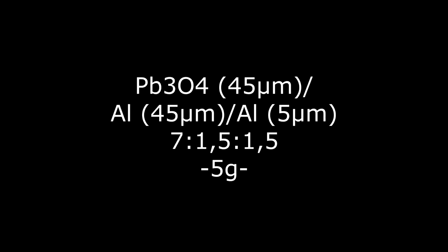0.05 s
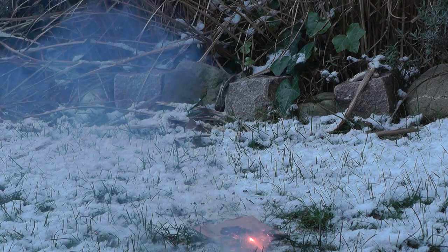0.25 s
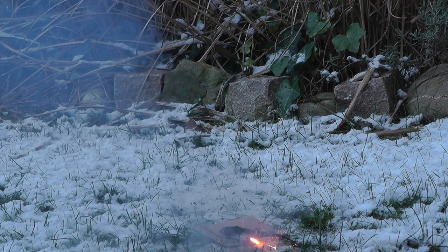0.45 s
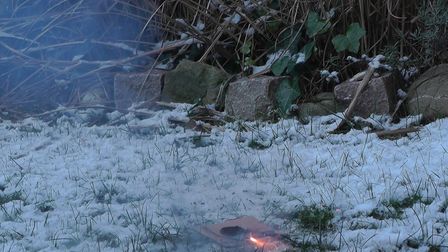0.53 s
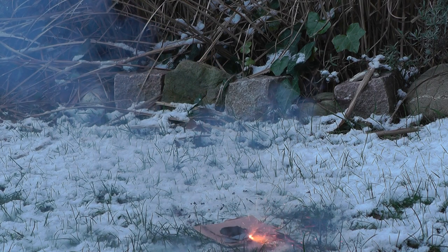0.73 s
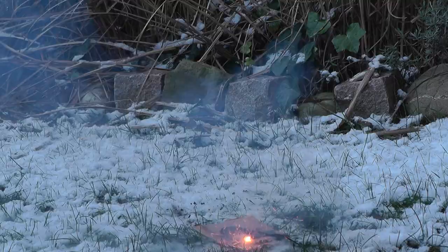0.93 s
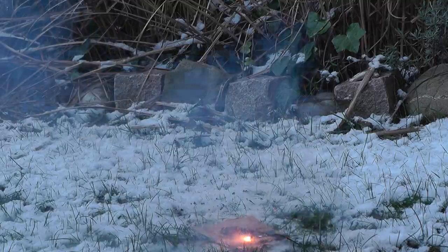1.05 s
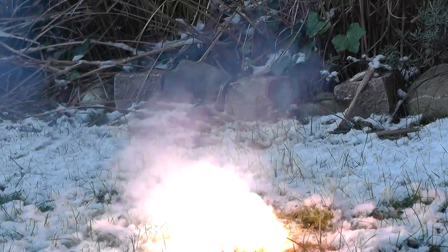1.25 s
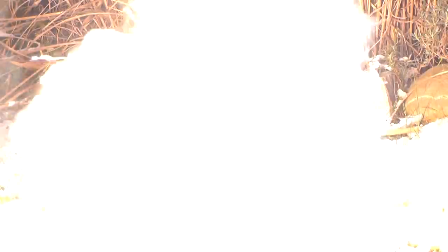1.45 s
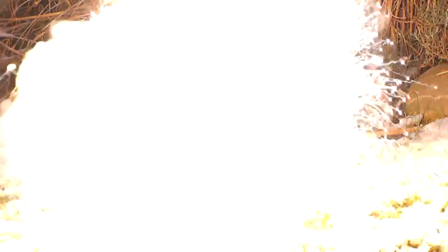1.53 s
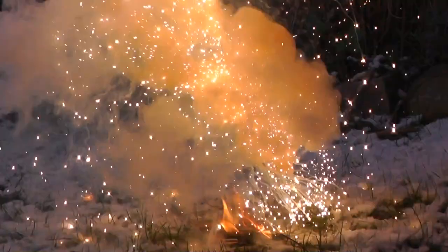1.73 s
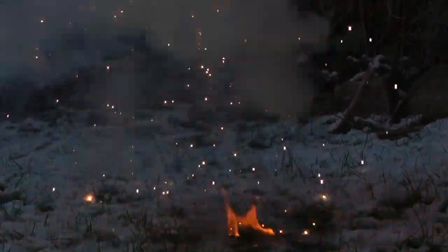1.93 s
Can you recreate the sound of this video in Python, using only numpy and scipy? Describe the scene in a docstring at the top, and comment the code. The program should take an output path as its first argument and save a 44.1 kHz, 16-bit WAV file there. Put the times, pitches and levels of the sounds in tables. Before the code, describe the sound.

A fuse hisses and sputters, then powder ignites with a whoosh and sizzling sparks.

```python
"""A sputtering, fizzing fuse cuts in just after the start, on a snowy lawn over a low outdoor rumble.
Its gas jet hisses, pockets of gas pop, and it burns into a heap of flash powder. The heap burns off
with a low whoosh of flame and a bright sizzle of sparks that thins out to single ticks.
Each burning source is shot noise, a rain of tiny random bursts, on a smooth rush of gas.
Nearby walls answer with echoes and resonances."""
import sys
import numpy as np
from scipy.fft import rfft, irfft, next_fast_len
from scipy.io import wavfile
from scipy.ndimage import map_coordinates

SR = 44100
rng = np.random.default_rng(int(sys.argv[2]) if len(sys.argv) > 2 else 0)


def store_pcm(level_fs):
    """Save levels as 16-bit WAV."""
    pcm = np.round(np.clip(level_fs, -1, 1) * 32767).astype(np.int16)
    wavfile.write(sys.argv[1], SR, np.atleast_2d(pcm).T)


N = 88200

# spectrum of burning metal grains: f/Hz, level/dB
SPARK_SPECTRUM = [(80, -2.5), (400, -2.5), (1100, -1.5), (1800, -1), (3000, 0.5), (4300, 2.5), (5500, -1),
                  (8000, -0.5), (12000, -4.5), (15500, -14.5)]


def amp(db):
    """Amplitude ratio of a level in decibels."""
    return 10 ** (np.asarray(db) / 20)


def unit(x):
    """Normalisation to rms 1."""
    return x / np.sqrt(np.mean(x ** 2) + 1e-20)


def clock():
    """Time of each sample in seconds."""
    return np.arange(N) / SR


def along(points, hz):
    """Interpolation of (f/Hz, value) rows on a logarithmic frequency axis."""
    f, v = np.transpose(points)
    return np.interp(np.log(hz + 1), np.log(f + 1), v)


def curve(rows):
    """Linear interpolation of (t/s, value) rows."""
    return np.interp(clock(), *np.transpose(rows))


def bell(centre_s, half_s):
    """Gaussian envelope, down to 1/e at half_s from its centre."""
    return np.exp(-((clock() - centre_s) / half_s) ** 2)


def wobble(rate):
    """Random modulation: a spline through rate knots a second."""
    return map_coordinates(rng.standard_normal(1024), [clock() * rate], mode="wrap")


def filtered(x, response):
    """Linear filtering: the spectrum of x times a frequency response."""
    m = next_fast_len(N + SR // 2)
    return irfft(rfft(x, m) * response(np.fft.rfftfreq(m, 1 / SR)), m)[..., :N]


def below(x, cutoff_hz):
    """Zero-phase low-pass; subtracting it from x leaves the upper band."""
    return filtered(x, lambda hz: 1 / (1 + (hz / cutoff_hz) ** 4))


def spread(pair, spectrum):
    """Partial coherence: two independent signals mix to coloured stereo of rms 1, widest in the treble."""
    # likeness of left and right: f/Hz, coherence
    coherence = [(30, 0.52), (80, 0.85), (250, 0.72), (550, 0.87), (1100, 0.77), (2100, 0.92), (3500, 0.58),
                 (5000, 0.39), (6000, 0.025), (7800, 0.66), (9700, .15), (10800, 0.32), (12800, 0.14),
                 (14200, 0.26), (15500, .03)]
    angle = lambda hz: np.arccos(np.clip(along(coherence, hz), -1, 1)) / 2
    mid, side = filtered(pair, lambda hz: amp(along(spectrum, hz)) * [np.cos(angle(hz)), np.sin(angle(hz))])
    return unit(np.array([mid + side, mid - side]))


def burning(spectrum, rate, scatter_db, rush_db):
    """Shot noise: tiny bursts of log-normal size, rate a second, on a Gaussian rush of gas."""
    hit = rng.random((2, N)) < rate / SR
    size = amp(scatter_db * np.clip(rng.standard_normal((2, N)), -2, 2))
    polarity = np.sign(rng.standard_normal((2, N)))
    bursts = unit(hit * size * polarity / np.sqrt(rate))
    return spread(bursts + amp(rush_db) * rng.standard_normal((2, N)), spectrum)


def fuse():
    """Jet noise: gas sputters from the fuse, with the fine fizz of the burning core above it."""
    # envelopes of gas jet and core: t/s, level/dB
    jet_level = [(.2, -35), (.35, -33.5), (.39, -33), (.45, -29), (.58, -30), (.72, -32.5), (.88, -32.7),
                 (.93, -32.5), (1.03, -30.6), (1.08, -32.5), (1.2, -32), (1.3, -33.5), (1.7, -60)]
    fizz_level = [(.2, -47), (.29, -48), (.4, -43), (.455, -37), (.6, -34.5), (.7, -38.5), (.79, -38.5),
                  (.825, -43.5), (.97, -56), (1.12, -63), (1.25, -54), (1.6, -111)]
    # their spectra: f/Hz, level/dB
    jet_spectrum = [(40, -30), (150, -13), (300, -4), (700, -1.5), (1200, -3), (2200, -3.5), (3000, -6.5),
                    (4300, -12), (5050, -19.5), (6200, -16.5), (8000, -29.5), (10000, -18), (15000, -30.5)]
    fizz_spectrum = [(1000, -15), (4000, -1.5), (5400, -0.5), (6600, 0.5), (7500, 2.5), (8400, 3),
                     (9200, -1), (11500, -6.5), (15500, -19)]
    jet = burning(jet_spectrum, rate=3400, scatter_db=3, rush_db=1.5)
    jet *= amp(curve(jet_level) + 0.75 * wobble(45.9))
    body = below(jet, cutoff_hz=1200)
    dull_db_per_s, dull_from_s = 11.5, 1.0  # the jet loses its top as it sinks into the heap
    top = (jet - body) * amp(-dull_db_per_s * np.maximum(clock() - dull_from_s, 0))
    fizz = burning(fizz_spectrum, rate=4500, scatter_db=4, rush_db=0.5)
    return body + top + fizz * amp(curve(fizz_level) + 0.72 * wobble(37))


def rumble():
    """Ambient noise: a low outdoor background under slow amplitude modulation."""
    # envelope: t/s, level/dB
    level = [(.2, -48.5), (.7, -48), (.95, -43.5), (1.15, -49), (1.75, -46), (1.85, -45), (2.0, -44)]
    # background spectrum: f/Hz, level/dB
    spectrum = [(20, -19), (50, -16), (78, 1.5), (120, -7.5), (168, 1.5), (300, -15), (1000, -16.5),
                (4000, -32), (15000, -52)]
    return amp(curve(level) + wobble(7.47)) * spread(rng.standard_normal((2, N)), spectrum)


def pops():
    """Pressure transients: each bursting pocket of gas radiates one short swing."""
    # gas pockets: t/s, level/dB before the band-pass, width/s
    pockets = [(.286, -21, 0.00024), (0.3952, -10.5, 0.00017), (.4235, -30, .00015), (.434, -14.5, 0.00018),
               (1.2271, -17, 0.00066), (1.2863, -11.5, 0.00038)]
    pressure = np.zeros(N)
    for s, db, width in pockets:
        age = np.maximum(clock() - s, 0) / width
        pressure += amp(db) * (clock() >= s) * (age / 2 - 1) * np.exp(-age / 2)
    return filtered(pressure, lambda hz: 1j * hz / (120 + 1j * hz) / (1 + 1j * hz / 3500))


def hiss():
    """Diffuse noise: the last length of fuse hisses wide, with little left-right coherence."""
    # envelope: t/s, level/dB
    level = [(.6, -69), (.82, -48), (1.0, -44), (1.1, -43), (1.26, -38.5), (1.4, -58), (1.7, -85)]
    # hiss spectrum: f/Hz, level/dB
    spectrum = [(2000, -32), (4000, -9), (5300, 8), (8000, 5), (9300, 6.5), (10500, -22), (13000, -13),
                (15500, -20)]
    left, right = burning(spectrum, rate=2700, scatter_db=-2, rush_db=2)
    mid, side = left + right, amp(2) * (left - right)
    return unit(np.array([mid + side, mid - side])) * amp(curve(level) + 0.7 * wobble(32.7))


def sputter():
    """Resonance: coarse spits excite a hollow ring that sinks in pitch just before ignition."""
    # envelope as the fuse burns into the heap: t/s, level/dB
    level = [(.7, -73), (.95, -40), (1.05, -33.5), (1.1, -41), (1.14, -39), (1.22, -46), (1.26, -53),
             (1.29, -36), (1.33, -49), (1.6, -94)]
    # single spits: t/s, added level/dB
    spits = [(1.048, 3.5), (1.139, 12.5), (1.173, 11), (1.231, 12)]
    ring = lambda hz: [(hz / 4, -16), (hz / 1.33, -7), (hz, 0),
                       (hz * 1.46, -9), (hz * 4, -26), (hz * 10, -55)]
    high, low = (burning(ring(hz), rate=1000, scatter_db=1.5, rush_db=7) for hz in (1020, 650))
    sunk = curve([(1.044, 0), (1.17, 1)])
    hollow = high * np.sqrt(1 - sunk) + low * np.sqrt(sunk)  # equal-power crossfade
    spit_db = sum(db * bell(s, half_s=0.0081) for s, db in spits)
    return hollow * amp(curve(level) + spit_db + wobble(90.3))


def flame():
    """Combustion noise: the heap smoulders, catches, swells to a fireball and collapses."""
    # envelope: t/s, level/dB
    level = [(.6, -60), (1.15, -44.5), (1.225, -40.5), (1.27, -37.5), (1.31, -32), (1.35, -30.5),
             (1.405, -32), (1.47, -26.5), (1.52, -23), (1.565, -26), (1.615, -33.5), (1.645, -41),
             (1.72, -62)]
    # flame spectrum: f/Hz, level/dB
    spectrum = [(25, -36), (50, -26), (68, -5.5), (120, -8.5), (240, -2.5), (700, -4), (1300, -12.5),
                (2500, -19), (6000, -47), (15000, -39)]
    roar = burning(spectrum, rate=2800, scatter_db=2, rush_db=2) * amp(curve(level) + 0.21 * wobble(40.2))
    billow = below(roar, cutoff_hz=168)
    top = roar - below(roar, cutoff_hz=950)
    blaze = amp(6 * bell(1.46, half_s=0.046))  # the treble lifts while the fireball grows fastest
    spent = amp(-68 * np.maximum(clock() - 1.65, 0))  # the deep billow fades once it has spread
    return billow * spent + top * blaze + (roar - billow - top)


def sparks():
    """Shot noise of falling rate: a spray of burning metal flares, sags and dies into ever fewer grains."""
    full_s, fade_s, full_db = 1.3527, 1.59, -25
    rise_db_per_s, sag_db_per_s, fall_db_per_s, dying_db_per_s2 = 229, 15.5, 36.5, 78
    t = clock()
    late = np.maximum(t - fade_s, 0)
    db = full_db - sag_db_per_s * np.clip(t - full_s, 0, fade_s - full_s)
    db -= fall_db_per_s * late + dying_db_per_s2 * late ** 2
    spray = burning(SPARK_SPECTRUM, rate=6000 * np.exp(-6.9 * late), scatter_db=2, rush_db=5.5)
    spray *= amp(db + 0.24 * wobble(30.55))
    coarse = below(spray, cutoff_hz=7660)
    flare = lambda peak_s: amp(-rise_db_per_s * np.maximum(peak_s - t, 0))
    return coarse * flare(full_s) + (spray - coarse) * flare(full_s - 0.023)  # the finest catch first


def heaves():
    """Volume source: the expanding gas shoves the air in short, deep wave packets."""
    # shoves: t/s, level/dB, f/Hz
    shoves = [(1.346, -29.5, 127), (1.447, -29, 83)]
    return sum(amp(db) * bell(s, half_s=0.0095) * np.sin(2 * np.pi * hz * (clock() - s))
               for s, db, hz in shoves)


def spurts():
    """Band noise in bursts: the spray surges briefly with a narrower, lower hiss."""
    # surges: t/s, half length/s, level/dB
    surges = [(1.353, 0.014, -31), (1.716, 0.02, -36.5)]
    # surge spectrum: f/Hz, level/dB
    spectrum = [(1000, -38), (2800, 2), (4600, 11), (5700, -15), (8000, -12), (15000, -24)]
    envelope = sum(amp(db) * bell(s, half_s) for s, half_s, db in surges)
    return envelope * spread(rng.standard_normal((2, N)), spectrum)


def ticks():
    """Impulsive noise with exponential decay: single sparks snap as they burn out."""
    # last sparks: t/s, level/dB
    snaps = [(1.72, -25), (1.7683, -27), (1.852, -27), (1.88, -36), (1.8848, -29.5), (1.930, -34.5),
             (1.958, -46)]
    t, decay_s = clock(), 0.0005
    envelope = sum(amp(db) * (t >= s) * np.exp(-np.abs(t - s) / decay_s) for s, db in snaps)
    return envelope * spread(rng.standard_normal((2, N)), SPARK_SPECTRUM)


def garden(x):
    """Interference and resonance: nearby walls add echoes and lift or hollow out narrow bands."""
    # reflections: delay t/s, share of the pressure (negative is inverted)
    walls = [(.00218, -0.13), (.00327, -0.051), (0.0126, .24)]
    # resonances of the stone-edged corner: f/Hz, width/Hz, added level/dB
    resonances = [(158.2, 21, 5.5), (241, 28, 4), (278, 18, -2), (388, 57, 1.5), (590.5, 45, 3),
                  (720, 33, 1), (1130, 230, 1.5)]
    echoes = lambda hz: 1 + sum(share * np.exp(-2j * np.pi * hz * s) for s, share in walls)
    lift_db = lambda hz: sum(db / (1 + (2 * (hz - f) / width) ** 2) for f, width, db in resonances)
    return filtered(x, lambda hz: echoes(hz) * amp(lift_db(hz)))


def scene():
    """Superposition: the fire and its reflections add to the background."""
    fire = fuse() + hiss() + sputter() + pops() + flame() + heaves() + sparks() + spurts() + ticks()
    return garden(fire) + rumble()


def record(dry):
    """Transfer function of the microphone, then a quick fade-in and a band limit."""
    # microphone response: f/Hz, level/dB
    response = [(4400, 0), (5700, -1), (7000, 2), (8200, 0), (9800, -5.5), (11500, 1), (15000, 4.5)]
    # channel balance: f/Hz, left minus right level/dB
    balance = [(100, -1.6), (3000, -1.55), (5400, 0.51), (8500, 0), (10000, -0.47), (11200, -2.2),
               (13000, -1), (15200, -2)]
    start_s, fade_in_s, top_hz = 0.1922, 0.004, 15800
    heard = filtered(dry, lambda hz: amp(along(response, hz) + np.outer([.5, -.5], along(balance, hz))))
    opening = np.clip((clock() - start_s) / fade_in_s, 0, 1)
    return filtered(heard * opening, lambda hz: np.clip((top_hz - hz) / 100 + .5, 0, 1))


dry = scene()
out = record(dry)
store_pcm(out)
```